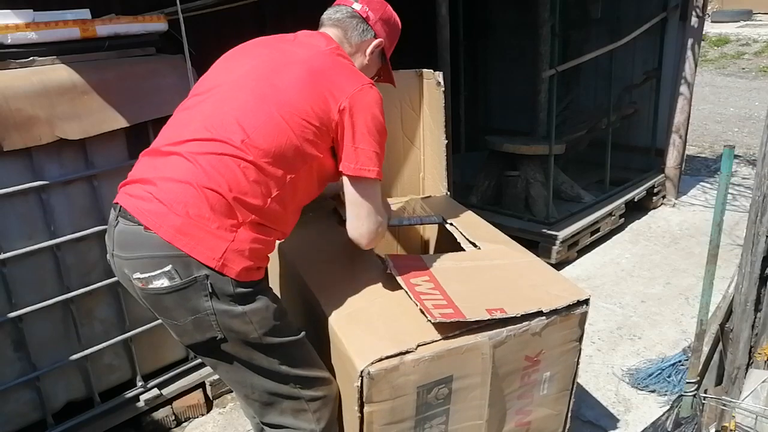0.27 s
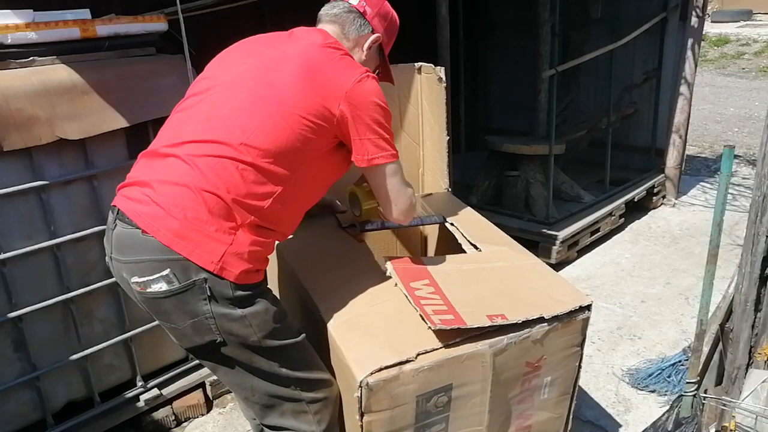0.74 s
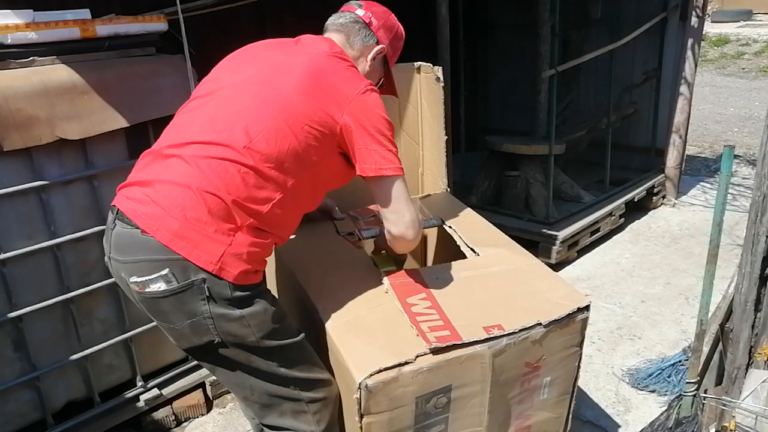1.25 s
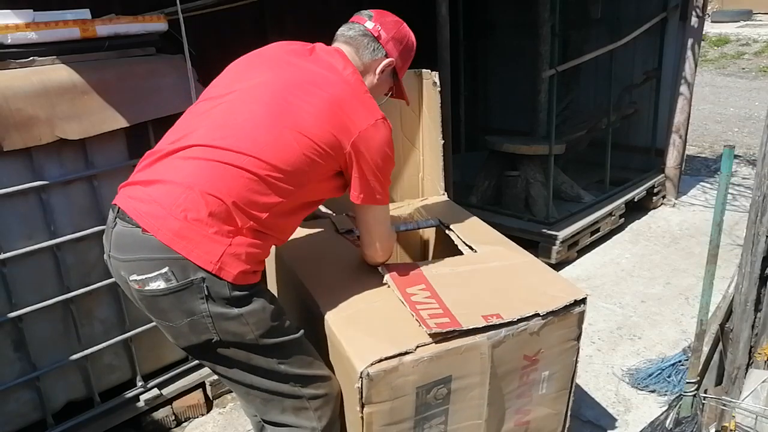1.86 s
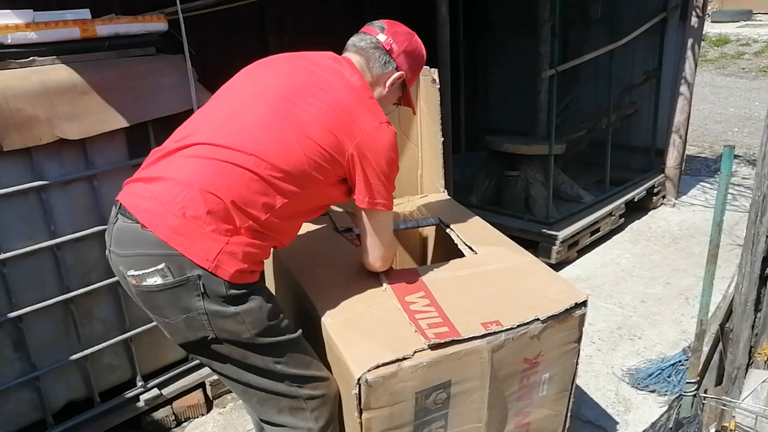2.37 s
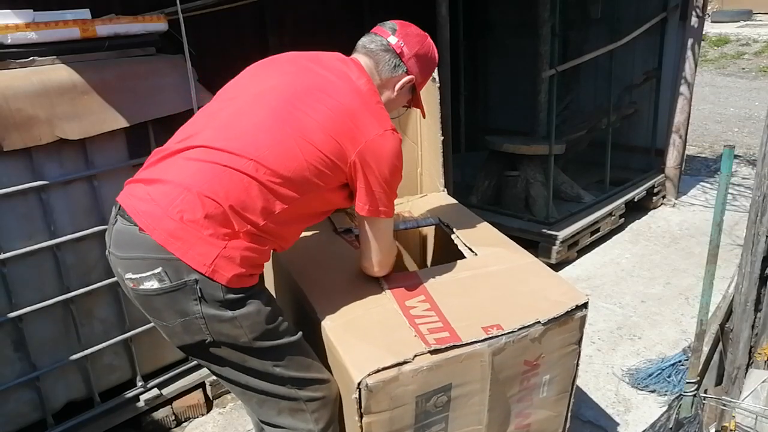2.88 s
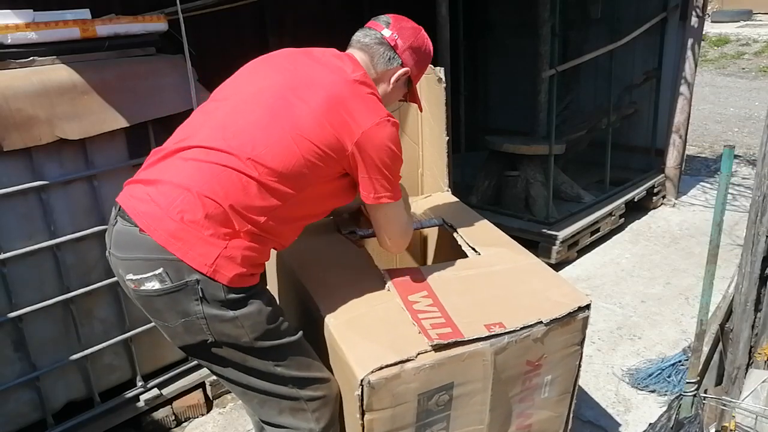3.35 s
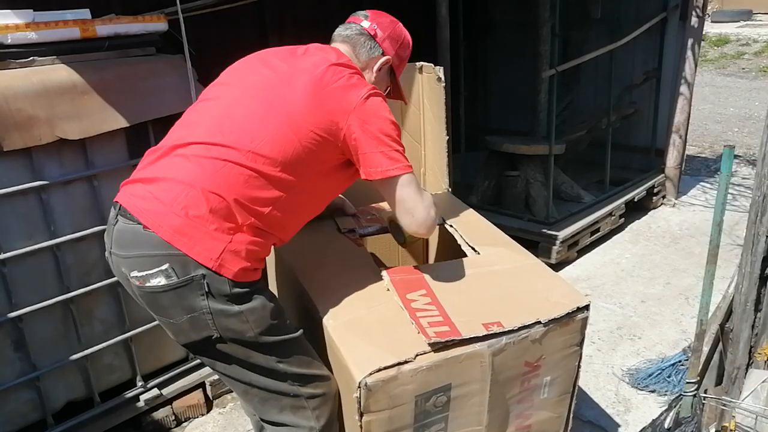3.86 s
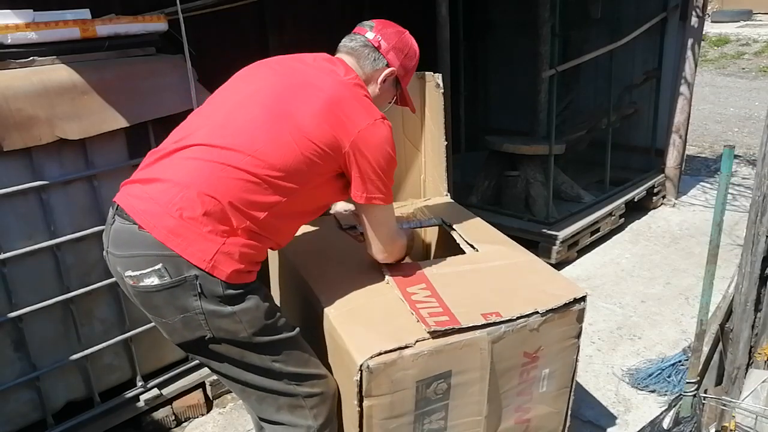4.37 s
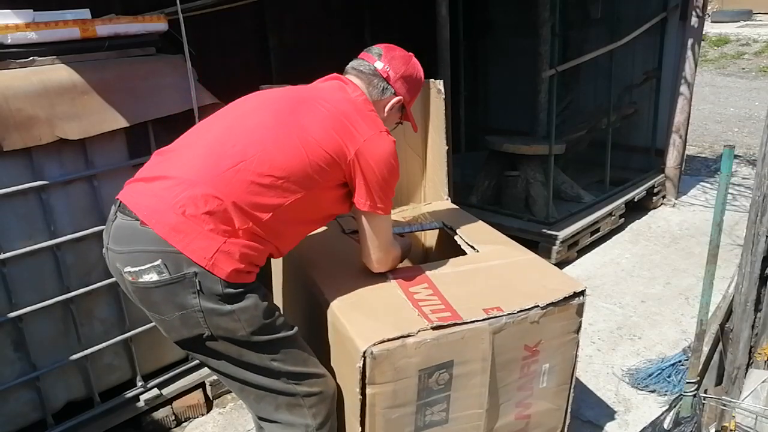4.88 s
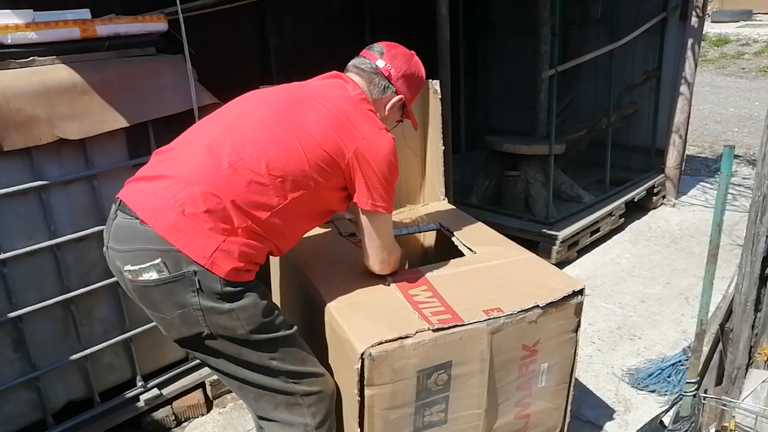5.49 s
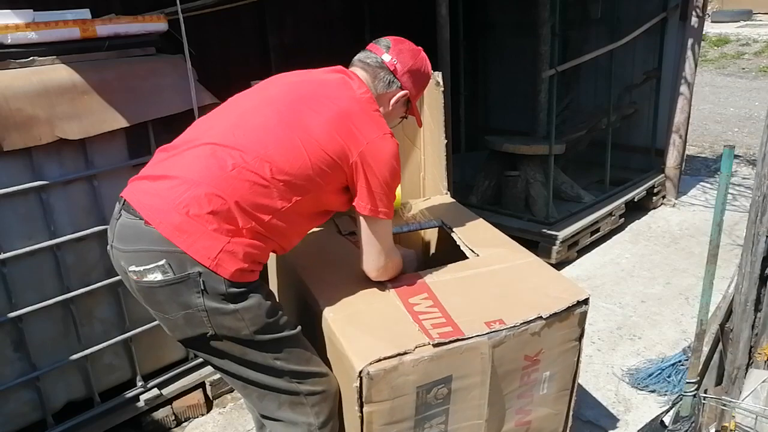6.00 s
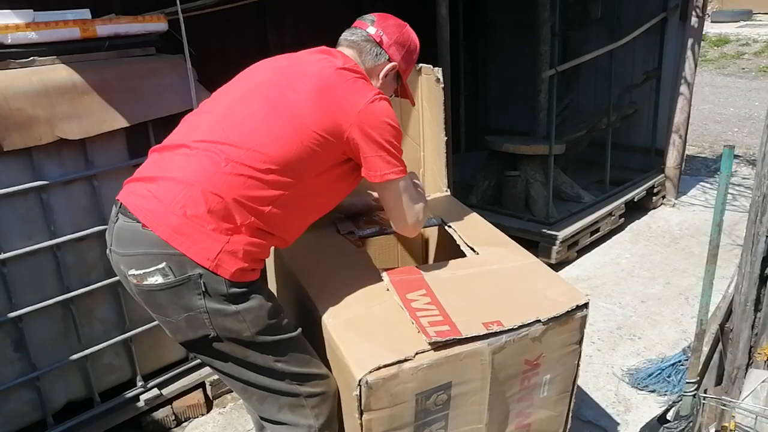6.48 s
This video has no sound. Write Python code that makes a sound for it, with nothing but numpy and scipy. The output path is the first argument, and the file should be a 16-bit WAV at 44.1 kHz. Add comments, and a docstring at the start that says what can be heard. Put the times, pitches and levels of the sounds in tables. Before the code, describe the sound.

Packing tape rasps off its roll close to the microphone, about five short pulls in the first 1.3 seconds, each a bright sizzle with a hollow cardboard ring, mixed with sharp sticky snaps. A lull follows, with scattered clicks, a light knock and a hand rubbing tape down. From 2.5 to 4.2 seconds comes another run of quick pulls, with clacks of the roll in a brief gap around 3.2. The hand then smooths the tape with a crackling rustle and two tiny squeaks near 4.3, and the box thumps softly. Three more pulls come between 5.2 and 5.7 seconds, followed by a low bump and more snaps. The last pulls run from 6.1 to about 6.7 seconds. Hard walls nearby give a very short echo, and a faint distant engine hums throughout under a soft wash of air.

```python
"""Close to hard walls, a stereo microphone near a big cardboard box that is being taped shut.
Packing tape comes off its roll in short rasping strips: the glue lets go in quick slips that shake the
peel line, the stretched film and the cardboard. Between pulls the tape snaps, rustles and squeaks under
the hand, the roll knocks and the box booms softly when pushed. Far away an engine hums."""
import sys
import numpy as np
from scipy import signal
from scipy.fft import rfft, irfft, next_fast_len
from scipy.io import wavfile
from scipy.ndimage import uniform_filter1d, map_coordinates

SR = 44100
rng = np.random.default_rng(int(sys.argv[2]) if len(sys.argv) > 2 else 0)


def put_to_file(sound):
    """Save the sound as 16-bit audio at rate SR, in the file named by the first command-line argument."""
    columns = np.atleast_2d(sound).T  # one column per channel
    safe = np.clip(columns, -1, 1)
    whole_steps = np.round(safe * 32767)
    wavfile.write(sys.argv[1], SR, whole_steps.astype(np.int16))


N = 297234
TIME = np.arange(N) / SR


def from_db(db):
    """Decibels to gain."""
    return 10 ** (np.asarray(db) / 20)


def unit_rms(x):
    """Scale to rms 1."""
    return x / np.sqrt(np.mean(x ** 2) + 1e-20)


def evened(x, size=1300):
    """Hold the power at 1 over some 30 ms, leaving the grain."""
    return x / np.sqrt(np.maximum(uniform_filter1d(x ** 2, size), 1e-9))


def in_time(rows):
    """The columns of a curve at every sample."""
    times, *columns = np.transpose(rows)
    return [np.interp(TIME, times, column) for column in columns]


def at_hz(points, hz):
    """Read a table on a log-frequency axis."""
    f, value = np.transpose(points)
    return np.interp(np.log(np.maximum(hz, 1)), np.log(f), value)


def progress(start, length):
    """0 before a gesture, rising to 1 at its end."""
    return np.clip((TIME - start) / length, 0, 1)


def gate(start, end, attack_s, release_s):
    """1 during a gesture, 0 outside it, with sloping edges."""
    return progress(start, attack_s) * (1 - progress(end, release_s))


def drift(per_s):
    """A random wander of rms 1."""
    knots = rng.standard_normal(4096)
    return unit_rms(np.interp(TIME * per_s, np.arange(len(knots)), knots))


def colour(x, spectrum):
    """Minimum-phase filter with the given spectrum; white input keeps its power."""
    size = 8192
    gain = unit_rms(from_db(at_hz(spectrum, np.fft.rfftfreq(size, 1 / SR))))
    cepstrum = irfft(np.log(gain))
    cepstrum[1:size // 2] *= 2
    cepstrum[size // 2 + 1:] = 0
    response = irfft(np.exp(rfft(cepstrum)))[:size // 2]
    return np.apply_along_axis(signal.oaconvolve, -1, x, response)[..., :N]


def resonate(x, hz, width_hz):
    """What a resonance, its pitch given at every sample, picks out of x."""
    turn = np.exp(2j * np.pi * np.cumsum(hz) / SR)
    pole = np.exp(-np.pi * width_hz / SR)
    return 2 * np.real(turn * signal.lfilter([1 - pole], [1, -pole], x / turn))


def slips(per_s, jitter, spread_db, tear_s, fray, count=1):
    """Tension builds and lets go with a click; glue threads then tear, differently in `count` parts."""
    phase = np.cumsum(per_s * np.exp(jitter * drift(400))) / SR
    clicks = np.diff(np.floor(phase), prepend=0) * from_db(spread_db * rng.uniform(-0.9, 1, N))
    tearing = signal.lfilter([1], [1, -np.exp(-1 / (tear_s * SR))], clicks + 1e-18)
    threads = tearing * rng.standard_normal((count, N))
    return evened(unit_rms(clicks) + fray * unit_rms(threads))


def cracks(per_s, spread_db):
    """Now and then a thicker thread of glue breaks with a click."""
    clicks = (rng.random(N) < per_s / SR) * rng.choice([-1, 1], N)
    return unit_rms(clicks * from_db(-spread_db * rng.random(N)))


# Strips pulled near the microphone: start t/s, fastest t/s, end t/s, sizzle level/dB, swell/dB,
# film offset/dB, cardboard offset/dB, ring f/Hz, ring gain/dB
TAPE_PULLS = [ (0.0, 0.01, 0.077, -36.5, -0.5, 1.5, -1.5, 384, -2),
              (0.344, 0.425, 0.505, -33.5, 2, -3.5, -7.5, 856, 8),
              (0.638, 0.80, 0.83, -42, 4, -2.5, -10.5, 1176, 6),
              (0.83, 0.939, 1.082, -32, 6, 4, -3.5, 782, 3),
              (1.19, 1.279, 1.34, -35, 4, -4.5, -14.5, 1190, -21),
              (2.473, 2.495, 2.573, -39, 7, 2.5, -2, 211, 13.5),
              (2.632, 2.685, 2.775, -36, 9, 1.5, -4.5, 430, 3),
              (2.804, 2.915, 3.037, -38.5, 8, -1.5, -4, 1028, 3.5),
              (3.037, 3.11, 3.195, -33, 1, -3, -13, 1250, -11),
              (3.55, 3.63, 3.71, -32.5, 10, 0, -10.5, 2102, 3.5),
              (3.736, 3.87, 3.94, -40, 2, 1, -2.5, 1252, 8),
              (3.85, 4.019, 4.198, -32, 3, 2.5, -6, 900, 2.5),
              (5.19, 5.246, 5.30, -33.5, 10, -3.5, -7, 2703, 7),
              (5.316, 5.41, 5.51, -36, 0, 1.5, -3.5, 295, 10.5),
              (5.555, 5.615, 5.685, -32.5, 3, 1, -1, 302, 2),
              (6.142, 6.191, 6.206, -30.5, 12, 0.5, -4, 882.6, 4),
              (6.224, 6.31, 6.34, -40, 2, -4, -4, 507, 0),
              (6.526, 6.615, 6.74, -29.5, 11, 2.5, -6.5, 2056, 1),
              (6.661, 6.727, 7.25, -32.5, 3, 0, -3, 1130, 4), ]
def pull_levels(attack_s, release_s, stall_db=16.0):
    """Gains of sizzle, film and cardboard: each pull swells to its fastest, slows gently, then stalls."""
    power = np.zeros((3, N))
    for start, fastest, end, level_db, swell_db, film_db, card_db, _, _ in TAPE_PULLS:
        span = slice(*np.searchsorted(TIME, [start, end + release_s]))
        rising = progress(start, fastest - start)[span]
        slowing = progress(fastest, end - fastest)[span]
        effort_db = -swell_db * (1 - rising) ** 2 - stall_db * slowing ** 2.6
        # film and cardboard gain most at speed
        parts_db = np.array([0 * effort_db, film_db + 0.52 * effort_db, card_db + 0.5 * effort_db])
        pulling = gate(start, end, attack_s, release_s)[span]
        power[:, span] += (from_db(level_db + effort_db + parts_db) * pulling) ** 2
    return np.sqrt(power)


# Spectra of peel line, stretched film and cardboard, close up: f/Hz, relative level/dB
SIZZLE_SPECTRUM = [(2500, -31), (3600, -19), (4300, -12), (5300, -0.5), (6200, -1.5), (7400, -6),
                   (8500, -5), (10500, -10.5), (12500, -9), (15000, -17), (17000, -7.5)]
FILM_SPECTRUM = [(350, -43), (600, -10), (780, -1.5), (1250, -2.5), (1600, -2.5), (2200, -2), (3100, -0.5),
                 (3700, -8), (5000, -11)]
CARD_SPECTRUM = [(70, -39), (150, -8), (220, -8), (300, -2.5), (420, -0.5), (520, 3.5), (650, -2.5),
                 (850, -15), (1400, -27.5)]
def pulls(crack_db):
    """A faster pull is louder and slips more often; each slip shakes peel line, film and cardboard."""
    sizzle_gain, film_gain, card_gain = pull_levels(attack_s=0.0008, release_s=0.004)
    per_s = np.clip(350 * (sizzle_gain / from_db(-38)) ** 0.9, 80, 1400)
    # uneven glue makes a slow peel come in clumps; a fast one runs evenly
    grip = from_db(np.minimum(400 / per_s, 2.5) * drift(220))
    slipping = slips(per_s, jitter=0.55, spread_db=5.5, tear_s=0.00093, fray=1.0, count=3)
    peel, film, card = evened(grip * slipping)
    breaking = from_db(crack_db) * cracks(per_s=45, spread_db=4)
    sizzle = from_db(1.8) * sizzle_gain * colour(peel + breaking, SIZZLE_SPECTRUM)
    film = from_db(0.06) * film_gain * evened(colour(film + breaking, FILM_SPECTRUM))
    card = from_db(-2.5) * card_gain * evened(colour(card, CARD_SPECTRUM))
    return sizzle - film + card


# Top treble at the peel line: t/s, shelf gain/dB
TREBLE_LIFT = [(0, -2), (1.6, 4), (2.4, -10), (3.2, -3), (3.7, -3), (4.6, -2), (5.6, -5.5), (6.2, -35),
               (6.74, -2)]
def spit(x, corner_hz):
    """The sharper the tape is bent back, the more treble it spits."""
    lift_db, = in_time(TREBLE_LIFT)
    treble = signal.sosfilt(signal.butter(1, corner_hz, "high", fs=SR, output="sos"), x)
    return x + (from_db(lift_db) - 1) * treble


# Fixed resonances of the stretched film and the cardboard: f/Hz, gain/dB
FILM_AND_CARD_MODES = [(300, -7.5), (775, -7), (1250, -5.5), (1670, -7), (2040, -6.5)]
def resonances(x, least_width_hz, relative_width, sag_octaves_per_s):
    """Film and cardboard colour all the tape sound; each strip adds a ring that sinks as it lengthens."""
    out = x.copy()
    for hz, gain_db in FILM_AND_CARD_MODES:
        out += from_db(gain_db) * resonate(x, np.full(N, hz), least_width_hz + relative_width * hz)
    for start, fastest, end, *_, hz, gain_db in TAPE_PULLS:
        span = slice(*np.searchsorted(TIME, [start, end + 0.03]))
        sinking_hz = hz * 2 ** (-sag_octaves_per_s * (TIME[span] - fastest))
        drive = x[:, span] * (TIME[span] < end)
        out[:, span] += from_db(gain_db) * resonate(drive, sinking_hz, least_width_hz + relative_width * hz)
    return out


# Diffuse sound at the microphone: f/Hz, left-right correlation
STEREO_LIKENESS = [(60, 0.87), (300, 0.78), (700, 0.67), (1400, 0.13), (2800, 0.17), (6000, 0), (16000, 0)]
def diffuse(size):
    """White stereo noise, alike in the bass and unrelated in the treble."""
    alike = at_hz(STEREO_LIKENESS, np.fft.rfftfreq(size, 1 / SR))
    mid, side = rfft(rng.standard_normal((2, size)))
    pair = np.sqrt(1 + alike) * mid + np.sqrt(1 - alike) * side * [[1], [-1]]
    return irfft(pair / np.sqrt(2), size)


# The hand leans on the box: t/s, length/s, level/dB
BOX_PUSHES = [(0.0, 0.16, -42.5), (0.127, 0.24, -49), (1.85, 0.62, -55), (3.40, 0.16, -55),
              (3.699, 0.13, -53), (4.414, 0.44, -53), (5.48, 0.28, -44), (5.72, 0.21, -51)]
# Spectrum of its panels: f/Hz, relative level/dB
BOOM_SPECTRUM = [(12, -44), (20, 0), (60, 0.5), (161, -4.5), (226, -23.5), (252, -18), (367, -27),
                 (403, -21), (443, -31), (500, -16.5), (650, -61), (1100, -120)]
def boom(rumble_db):
    """The panels boom with each push, swelling and fading over a steady rumble."""
    pushes = sum(from_db(db) * np.sin(np.pi * progress(t, length)) for t, length, db in BOX_PUSHES)
    return np.hypot(pushes, from_db(rumble_db)) * colour(diffuse(next_fast_len(N)), BOOM_SPECTRUM)


# An engine, far off: t/s, firing f/Hz, fundamental level/dB, third harmonic level/dB
FAR_ENGINE = [(0, 87.3, -66, -65), (1.2, 88, -63, -66), (1.55, 87.3, -59.5, -53), (1.9, 87.54, -58.5, -70),
              (2.3, 87.4, -55.5, -66), (2.7, 87.09, -68, -70), (6.74, 84.09, -66, -70)]
def engine(second_re_first_db, fourth_re_third_db):
    """Four harmonics of the firing rate, wavering in pitch and level."""
    hz, first_db, third_db = in_time(FAR_ENGINE)
    phase = 2 * np.pi * np.cumsum(hz * (1 + 0.0109 * drift(14))) / SR
    levels = [first_db, first_db + second_re_first_db, third_db, third_db + fourth_re_third_db]
    return sum(np.sqrt(2) * from_db(db + 2.6 * drift(22)) * np.sin(k * phase)
               for k, db in enumerate(levels, 1))


# Background all round the microphone: f/Hz, relative level/dB
AIR_SPECTRUM = [(15, -22), (50, 4), (110, -6.5), (220, -4.5), (330, -7), (550, -12.5), (1000, -16),
                (2600, -23), (4000, -27.5), (5600, -21.5), (10000, -29), (15000, -33)]
def air(level_db):
    """A faint, steady wash, strongest in the bass."""
    return from_db(level_db) * colour(diffuse(next_fast_len(N)), AIR_SPECTRUM)


# The box is nudged: t/s, length/s, f/Hz, level/dB
BOX_NUDGES = [(0.02, 0.1, 48.4, -44), (4.615, 0.18, 61.2, -42.5), (5.62, 0.085, 50, -39),
              (5.734, 0.031, 146, -39.5)]
def thumps():
    """A few slow swings of a panel that swell and fade."""
    return sum(from_db(db) * np.sin(np.pi * progress(t, length)) * np.sin(2 * np.pi * hz * (TIME - t))
               for t, length, hz, db in BOX_NUDGES)


# Single snaps of glue and film, close up: t/s, sizzle level/dB, film offset/dB
GLUE_SNAPS = [(0.092, -13.5, -9.5), (0.3457, -9.5, 0.5), (0.493, -18.5, 2), (0.639, -10, -11),
              (0.653, -13, -16), (0.6838, -21, 9.5), (0.7003, -21, 8), (0.717, -22, -3), (0.7299, -6, -1.5),
              (0.7464, -15, -5), (0.765, -4, -0.5), (0.7962, -2, -5), (0.799, -9.5, 5.5), (0.9726, -10, -3),
              (1.0882, -6.5, -7.5), (1.19, -6.5, -11), (1.4515, -7.5, -14.5), (1.5364, -5.5, -18.5),
              (1.6009, -12, -13.5), (1.7025, -12, -13), (1.7283, -6, -7), (1.7433, -4, -7),
              (3.0388, -5, 0.5), (3.0599, -11, -10), (3.2366, -9, -6), (3.2525, -9.5, -3),
              (3.2837, -8.5, -22), (3.5492, -8, -5), (3.737, -12, 4), (3.7404, -7, -1.5), (4.219, -10, -3),
              (4.25, -10, -8.5), (4.2807, -9.5, -4.5), (4.5102, -25.5, -15), (4.7519, -28.5, -5),
              (4.8067, -22, -12), (4.8375, -8, -21), (4.903, -16.5, -25), (4.928, -6.5, -12),
              (5.045, -14, -7), (5.1839, -8, -9.5), (5.194, -6, -24), (5.212, -4, -16.5), (5.2266, -5, -18),
              (5.5582, -10, -3.5), (5.7672, -29, 5.5), (5.9182, -11, -11), (5.9387, -10, -2.5),
              (5.9666, -7.5, -8), (6.1157, -15.5, -7), (6.1318, -9, -16), (6.143, -5.5, -22),
              (6.308, -4.5, -6.5), (6.4254, -5, -14.5), (6.527, -10, 1), (6.5434, -9, 3.5)]
def snaps(sharp_s, soft_s, sharp_crumble, soft_crumble, card_db):
    """Lone releases: a sharp click at the peel line, a longer crumble in film and cardboard."""
    drives = np.zeros((3, N))
    age = np.arange(512) / SR
    sharp = sharp_crumble * np.exp(-age / sharp_s)
    soft = soft_crumble * np.exp(-age / soft_s)
    for t, level_db, film_db in GLUE_SNAPS:
        burst = rng.standard_normal((3, len(age))) * [sharp, soft, soft]
        burst[:, 0] = 1  # the click
        gains = from_db(level_db + np.array([0, film_db, card_db])) / np.linalg.norm(burst, axis=1)
        i = int(t * SR)
        drives[:, i:i + len(age)] += gains[:, None] * burst
    sizzle, film, card = map(colour, drives, [SIZZLE_SPECTRUM, FILM_SPECTRUM, CARD_SPECTRUM])
    return from_db(-3.0) * sizzle - from_db(-2.14) * film + card


# The hand smooths the tape down: start t/s, end t/s, level/dB
HAND_STROKES = [(0.116, 0.159, -46.5), (0.205, 0.325, -60), (1.118, 1.183, -52.5), (1.355, 1.417, -55.5),
                (1.486, 1.523, -59), (1.887, 2.112, -56.5), (2.322, 2.42, -52), (2.437, 2.481, -45),
                (4.172, 4.229, -46.5), (4.299, 4.478, -49.5), (4.49, 4.659, -61.5), (4.664, 4.716, -50),
                (4.778, 4.84, -56.5), (4.83, 4.96, -50.5), (5.055, 5.096, -49), (5.715, 5.79, -55.5),
                (5.825, 5.94, -57), (6.361, 6.512, -55.5)]
# Spectrum of the rubbed film: f/Hz, relative level/dB
RUSTLE_SPECTRUM = [(150, -14), (400, -15), (800, -0.5), (1400, -7.5), (2700, 5), (4000, -4.5), (5600, 3.5),
                   (8400, -2), (15000, -12)]
def rustle(fade_db):
    """Fine crackle of film rubbed onto cardboard; each stroke eases off towards its end."""
    level = np.zeros(N)
    for start, end, level_db in HAND_STROKES:
        easing = from_db(level_db - fade_db * progress(start, end - start))
        level += easing * gate(start, end, attack_s=0.0057, release_s=0.025)
    grains, = slips(np.full(N, 220.0), jitter=0.73, spread_db=16.0, tear_s=0.0031, fray=1.7)
    return level * colour(grains, RUSTLE_SPECTRUM)


# The roll knocks on the box or clacks in the hand: t/s, f/Hz, level/dB
ROLL_KNOCKS = [(0.206, 248, -24), (1.536, 703, -21), (2.44, 250, -20), (2.87, 174, -18.5),
               (3.2364, 2310, -8.5), (3.2841, 2360, -9), (3.7401, 600.6, -12), (4.21, 347, -26),
               (6.4252, 640, -20.5), (6.532, 185, -14)]
def knocks(decay_cycles):
    """Each knock rings at one pitch and dies within a few cycles."""
    out = np.zeros(N)
    age = np.arange(2048) / SR
    for t, hz, level_db in ROLL_KNOCKS:
        ring = np.sin(2 * np.pi * hz * age) * np.exp(-age * hz / decay_cycles)
        i = int(t * SR)
        out[i:i + len(age)] += from_db(level_db) * ring / np.linalg.norm(ring)
    return out


# Skin on film, close up: t/s, length/s, start f/Hz, end f/Hz, level/dB
SKIN_SQUEAKS = [(4.297, 0.021, 5350, 4500, -46), (4.328, 0.02, 4800, 6330, -44.5),
                (5.54, 0.0144, 4274, 7290, -48)]
def squeaks(octave_db):
    """Skin rubs the film in short wavering glides with an overtone."""
    out = np.zeros(N)
    waver = 1 + 0.044 * drift(1500)
    for t, length, start_hz, end_hz, level_db in SKIN_SQUEAKS:
        along = progress(t, length)
        phase = 2 * np.pi * np.cumsum((start_hz + (end_hz - start_hz) * along) * waver) / SR
        tone = np.sin(phase) + from_db(octave_db) * np.sin(2 * phase)
        out += from_db(level_db) * np.sin(np.pi * along) * tone
    return out


# Ring time of the box and the walls close by: f/Hz, t60/s
RING_TIMES = [(200, 0.14), (1000, 0.14), (3000, 0.19), (6000, 0.17), (14000, 0.13)]
def echo_tail():
    """Dense short stereo echoes, dying at their own pace in each band."""
    size = 16384
    age, hz = np.arange(size) / SR, np.fft.rfftfreq(size, 1 / SR)
    noise, tail = rfft(diffuse(size)), 0
    for band_hz, t60 in RING_TIMES:
        share = at_hz([(f, float(f == band_hz)) for f, _ in RING_TIMES], hz)
        decay = from_db(-60 * age / t60) * (1 - np.exp(-age / 0.00047))
        tail = tail + irfft(noise * share) * decay / np.linalg.norm(decay)
    return tail


def reflections(x, patterns=3):
    """The echo pattern keeps changing as tape, hands and body move."""
    weights = np.array([drift(25) for _ in range(patterns)])
    weights /= np.linalg.norm(weights, axis=0)
    return sum(signal.oaconvolve((w * x)[None], echo_tail(), axes=1)[:, :N] for w in weights)


# Where the hands work, seen from the microphone: t/s, left minus right/dB
HAND_PAN = [(0.0, 0), (1.4, 0), (1.8, -1), (3.1, -2.5), (3.6, -1.5), (4.3, 1), (4.8, -0.5), (6.74, 0)]
# Colour of the two microphone ports: f/Hz, left minus right/dB
PORT_BALANCE = [(100, 0), (300, 1.5), (1200, 0.5), (2500, -0.5), (4500, 0.5), (6000, -3.5), (8000, 5.5),
                (10500, 4.5), (14000, -2.5)]
def microphone(pair, lag_start_s, lag_end_s):
    """The two ports colour the treble differently, and the right one hears the hands later."""
    left = colour(pair[0], [(hz, db / 2) for hz, db in PORT_BALANCE])
    right = colour(pair[1], [(hz, -db / 2) for hz, db in PORT_BALANCE])
    lag_s = np.linspace(lag_start_s, lag_end_s, N)
    right = map_coordinates(right, [(TIME - lag_s) * SR], order=3)
    pan_db, = in_time(HAND_PAN)
    return np.array([left, right]) * from_db([pan_db / 2, -pan_db / 2])


def scene():
    """Tape and hands near the microphone, the box booming below, engine and air behind."""
    rasp = pulls(crack_db=-10) + rustle(fade_db=11.5)
    clicks = snaps(sharp_s=0.0003, soft_s=0.0022, sharp_crumble=0.3, soft_crumble=0.59, card_db=-23.5)
    tape = spit(np.array([rasp, clicks]), corner_hz=10500)
    rasp, clicks = resonances(tape, least_width_hz=11, relative_width=0.054, sag_octaves_per_s=0.099)
    clicks = clicks + knocks(decay_cycles=2.4) + squeaks(octave_db=-3.0)
    # the roll works inside the opening of the box, so its rasp arrives mostly by reflection
    direct = from_db(-3.0) * rasp + from_db(0.5) * clicks
    echoes = reflections(from_db(-0.58) * rasp + from_db(0.1) * clicks)
    near = microphone(direct + echoes, lag_start_s=50e-6, lag_end_s=20e-6)
    background = air(level_db=-61)
    low = boom(rumble_db=-62.5) + thumps() + engine(second_re_first_db=-6.5, fourth_re_third_db=-15.0)
    return near + background + low * from_db([[-1.1], [1.1]])  # the bass leans to the right


def record(dry):
    """The top is cut steeply above 15.7 kHz."""
    return signal.sosfilt(signal.ellip(10, 0.2, 80, 15700, fs=SR, output="sos"), dry)


dry = scene()
out = record(dry)
put_to_file(out)
```